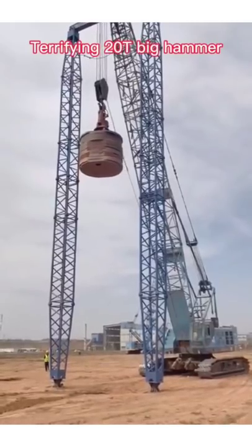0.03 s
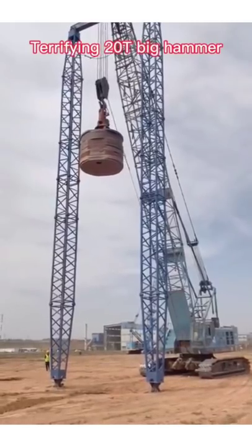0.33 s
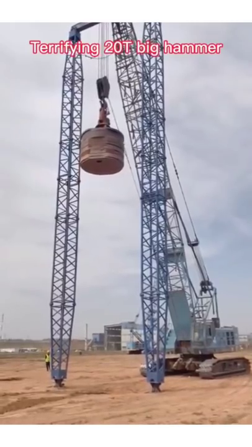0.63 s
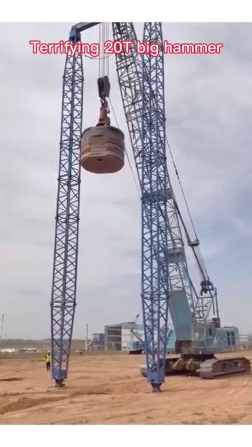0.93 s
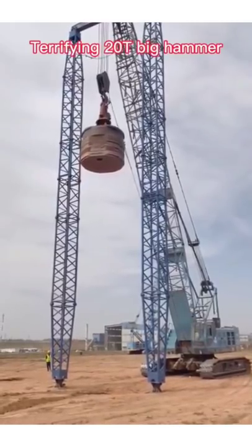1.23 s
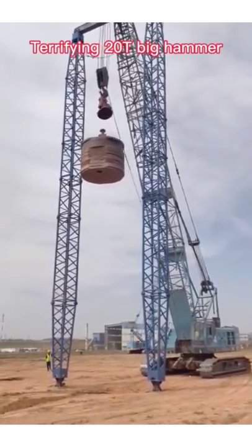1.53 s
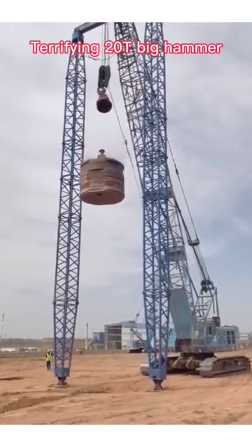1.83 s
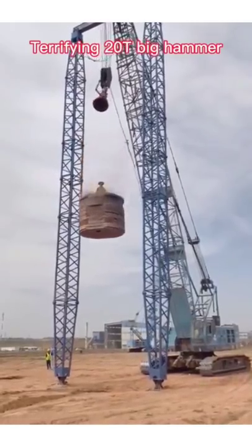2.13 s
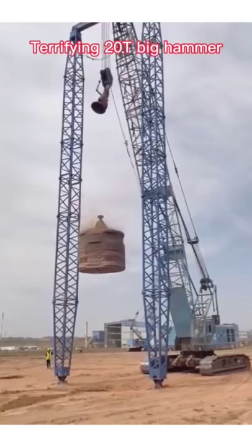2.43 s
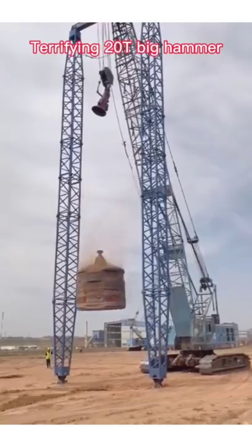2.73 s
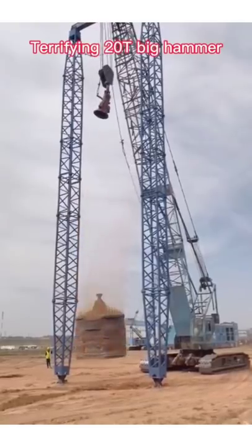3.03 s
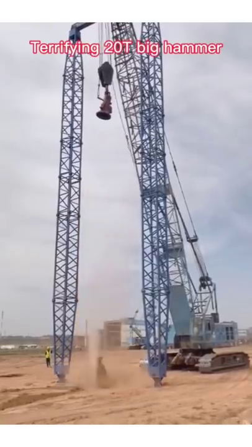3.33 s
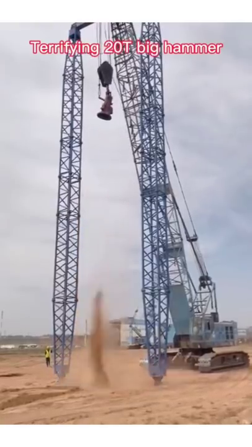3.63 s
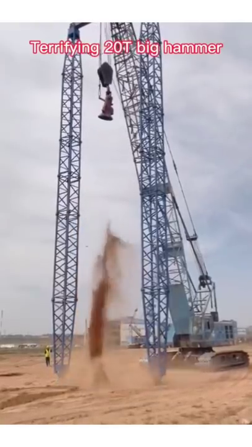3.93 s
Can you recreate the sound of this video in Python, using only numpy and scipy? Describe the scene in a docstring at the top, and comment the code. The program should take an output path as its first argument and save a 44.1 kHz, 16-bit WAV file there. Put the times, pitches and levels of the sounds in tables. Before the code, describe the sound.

A crane drops a heavy weight outdoors, its diesel droning and wind puffing on the microphone throughout. A hissing winch whine sinks until a loud steel clank at about 1.1 seconds. A hollow knock follows at 1.6, while the boom and cables rattle and fade with smaller clanks. At 3.4 seconds the weight thuds into the ground, then soil sprays and patters down with a light metal clink.

```python
"""A crawler crane lifts a heavy tamping weight: the diesel drones, the winch whines, wind hits the mic.
Just after 1 s the hook lets go with a clank, then knocks again. The unloaded boom (the crane's arm)
and its cables rattle while the weight falls. Near 3.4 s it slams into the soil and throws up dirt.
All along, a sliding filter dulls the treble and cuts narrow gaps in it."""
import sys
import numpy as np
from scipy import signal
from scipy.fft import rfft, irfft
from scipy.io import wavfile

SR = 44100
rng = np.random.default_rng(int(sys.argv[2]) if len(sys.argv) > 2 else 0)


def wav_record(signal):
    """Record a signal, one row per channel, as 16-bit PCM in the file named by sys.argv[1]."""
    frames = np.transpose(np.atleast_2d(signal))
    bounded = np.clip(frames, -1, 1)
    # unit amplitude maps onto the largest positive 16-bit level
    quanta = np.round(bounded * 32767).astype(np.int16)
    wavfile.write(sys.argv[1], SR, quanta)


N = 176400


def amp(db):
    """Turns decibels into a gain."""
    return 10 ** (np.asarray(db) / 20)


def evened(x):
    """Scales a signal to an average strength (rms) of 1."""
    return x / np.sqrt(np.mean(x ** 2) + 1e-20)


def curve(rows, column=1):
    """Joins one column of a time table with straight lines."""
    rows = np.array(rows)
    return np.interp(np.arange(N) / SR, rows[:, 0], rows[:, column])


def noise(size=N):
    """Plain white noise."""
    return rng.standard_normal(size)


def colour(x, points, scale=1, tilt_db=0):
    """Sets the mix of bass and treble, moved in pitch by scale and tilted per octave; rms 1."""
    hz = np.fft.rfftfreq(len(x), 1 / SR) + 1
    point_hz, point_db = np.transpose(points)
    shape_db = np.interp(np.log(hz), np.log(point_hz * scale), point_db)
    shape_db += tilt_db * np.log2(np.clip(hz, 150, 4000) / 1000)
    return evened(irfft(rfft(x) * amp(shape_db) * hz / (hz + 8), len(x)))


def wander(hz):
    """A random drift, up to about hz wiggles a second; rms 1."""
    rates = np.fft.rfftfreq(1024, N / SR / 1024)
    slow = evened(irfft(rfft(noise(size=1024)) / (1 + (rates / hz) ** 4)))
    return np.interp(np.arange(N), np.linspace(0, N, len(slow)), slow)


def grains(per_s, spread_db, wash, size=N):
    """Tiny random hits of uneven size over a soft hiss."""
    strength = amp(spread_db * np.minimum(rng.exponential(1, size), 3))
    hits = strength * np.sign(noise(size)) * (rng.random(size) < per_s / SR)
    return evened(hits) + wash * noise(size)


def blow(db, rise, hold, fade):
    """The loudness of one hit: it swells, holds, then drops 60 dB in fade seconds."""
    t = np.arange(SR) / SR
    return np.minimum(t / rise, 1) ** 2 * amp(db - 60 * np.maximum(t - rise - hold, 0) / fade)


def ring(notes, rise):
    """One second of the fading notes of something struck."""
    t = np.arange(SR) / SR
    ringing = sum(amp(db - 60 * t / fade) * np.sin(2 * np.pi * (hz * t + rng.random()))
                  for hz, db, fade in notes)
    return np.sqrt(2) * np.minimum(t / rise, 1) * ringing


def tone(hz, waver):
    """A slightly unsteady pure tone; rms 1."""
    cycles = np.cumsum(hz * (1 + waver * wander(hz=25))) / SR
    return np.sqrt(2) * np.sin(2 * np.pi * (cycles + rng.random()))


def add(mix, start, sound):
    """Mixes a sound in at start seconds."""
    first = round(start * SR)
    sound = sound[max(-first, 0):]
    part = mix[max(first, 0):][:len(sound)]
    part += sound[:len(part)]


def high_tone():
    """A faint, breathy high tone slides down with the filter sweep at first, then holds."""
    # its path: time_s, pitch_hz, level_db
    tone_path = [(0, 3620, -45.5), (1.2, 3000, -49.5)]
    breath = amp(curve(tone_path, column=2)) * wander(hz=45)
    return breath * tone(curve(tone_path), waver=.01)


def wind():
    """Wind pushes on the microphone: a lumpy rumble and short puffs."""
    # tone colour of rumble and puffs: pitch_hz, level_db
    rumble_colour = [(12, -12), (28, -2), (60, 0), (110, -3), (200, -16), (2000, -80)]
    puff_colour = [(20, -16), (70, -9), (140, 0), (230, -2), (420, -9), (700, -24), (2000, -50)]
    # loudness of the rumble: time_s, level_db
    rumble_level = [(0, -32), (.3, -37), (.5, -45), (.62, -35), (.8, -35), (.98, -42), (1.1, -30),
                    (1.19, -53), (2, -41), (2.24, -34), (2.53, -43), (3.27, -36), (4, -33.5)]
    # puffs: middle_s, half_length_s, level_db, pitch_factor
    puffs = [(.015, .025, -23, 1.1), (.185, .012, -20, 1.1), (.25, .016, -25, 1), (.598, .02, -24.5, 1.2),
             (.73, .022, -21, 1.15), (.835, .03, -28, 1), (.895, .02, -25, 1.1), (1.035, .022, -25, .9),
             (2.15, .025, -31, .8), (2.24, .015, -29, .6), (2.315, .02, -27, .65), (3.125, .018, -25, .7),
             (3.275, .02, -28, .7), (3.42, .03, -25, .8), (3.98, .02, -20, .7)]
    out = amp(curve(rumble_level) + 2.5 * wander(hz=14)) * colour(noise(), rumble_colour)
    t = np.arange(-SR // 4, SR // 4) / SR
    for middle, half_length, db, scale in puffs:
        swell = amp(db) * np.exp(-.5 * (t / half_length) ** 2)
        add(out, middle + t[0], swell * colour(noise(len(t)), puff_colour, scale))
    return out


def diesel():
    """The engine drones and the machinery hums; the drone eases as the load lets go."""
    # tone colour of the drone: pitch_hz, level_db
    drone_colour = [(25, -18), (70, -8.5), (135, 2), (340, -4), (470, -12.5), (800, -12), (1150, -26),
                    (2100, -26), (5000, -54), (14000, -62)]
    # its loudness: time_s, level_db
    drone_level = [(1.1, -35), (1.25, -39), (2.15, -32.5), (3.3, -33.5)]
    # humming notes: pitch_hz, level_db
    hum_notes = [(172, -44), (431, -47), (565, -48)]
    drone = amp(curve(drone_level) + 1.5 * wander(hz=12)) * colour(noise(), drone_colour)
    hum = sum(amp(db + 3 * wander(hz=6)) * tone(hz, waver=.02) for hz, db in hum_notes)
    return drone + hum


def winch():
    """The winch hisses under load while its whine sinks in pitch."""
    # main whine and brief upper whine: time_s, pitch_hz, level_db
    main_whine = [(0, 1000, -48), (.25, 885, -45), (.48, 858, -44), (.62, 846, -39), (.92, 806, -35),
                  (1.03, 775, -38), (1.12, 742, -36), (1.17, 725, -65)]
    upper_whine = [(0, 1100, -44), (.2, 1040, -47), (.6, 960, -70)]
    # tone colour of the hiss: pitch_hz, level_db
    hiss_colour = [(150, -8), (500, 0), (1300, -6.5), (2600, -5.5), (3400, -7.5), (4800, -6), (7000, -13.5),
                   (14000, -30)]
    # its loudness: time_s, level_db
    hiss_level = [(0, -35), (.45, -36), (.8, -34.5), (1.1, -36), (1.9, -41), (2.4, -60), (4, -62)]
    whine = sum(amp(curve(path, column=2) + 1.5 * wander(hz=20)) * tone(curve(path), waver=.004)
                for path in (main_whine, upper_whine))
    hiss = amp(curve(hiss_level)) * colour(noise(), hiss_colour)
    return whine + hiss


def rattle():
    """Many small hits ring the steel boom and its cables."""
    # tone colour of the rattle: pitch_hz, level_db
    rattle_colour = [(80, -22), (180, -4), (330, 0), (500, -3.5), (1100, -2), (1700, -8.5), (2700, -7.5),
                     (4000, -15), (7500, -20), (14000, -36)]
    # its loudness: time_s, level_db
    rattle_level = [(1.14, -80), (1.19, -25), (1.37, -26.5), (1.43, -23.5), (1.55, -23.5), (1.68, -27.5),
                    (1.8, -30.5), (1.95, -29.5), (2.15, -35), (2.35, -41), (2.53, -45), (2.75, -38),
                    (3, -38.5), (3.3, -55), (4, -70)]
    one_hit = noise(SR) * blow(db=0, rise=.001, hold=0, fade=.1)
    shaken = signal.fftconvolve(grains(per_s=350, spread_db=3.5, wash=.6), one_hit)[:N]
    return amp(curve(rattle_level) + .8 * wander(hz=15)) * colour(shaken, rattle_colour)


def clanks():
    """Steel hits steel: each crash rings the hook, and its treble dies twice as fast as the rest."""
    # clanks of hook and boom: start_s, level_db, rise_s, fade_s, tilt_db_per_octave
    hits = [(1.141, -6.7, .012, .08, 3.4), (1.158, -10.5, .014, .27, -1.8), (1.235, -15.3, .014, .42, -1.7),
            (1.838, -21, .008, .22, -3), (2.272, -27, .016, .13, 8.5), (2.588, -26.5, .005, .4, -7.5),
            (2.676, -30.5, .006, .25, -4.5), (2.875, -27, .006, .2, -5.5)]
    # tone colour of a crash before its tilt: pitch_hz, level_db
    crash_colour = [(60, -30), (150, -12), (230, -1), (600, 0), (1000, -2), (1650, -2), (2100, -9),
                    (3300, -3), (4500, -4), (6500, -7), (11000, -14), (15000, -30)]
    # the hook's own notes: pitch_hz, relative_level_db, fade_s
    hook_notes = [(250, -13, .36), (510, -9, .3), (603, -11, .3), (968, -15, .3), (1567, -14, .2),
                  (1728, -20, .3), (1855, -19, .35), (2487, -24, .35), (3322, -18, .25)]
    # the boom's low ring as the load leaves it: start_s, level_db, rise_s, fade_s, pitch_hz
    boom_note = (1.231, -14, .014, .3, 352)
    treble_hz, hook_db = 7000, -5.5
    out = np.zeros(N)
    cut_treble = signal.butter(2, treble_hz, fs=SR, output="sos")
    for start, db, rise, fade, tilt in hits:
        crash = colour(grains(per_s=4000, spread_db=2.5, wash=1.2, size=SR), crash_colour, tilt_db=tilt)
        body = signal.sosfiltfilt(cut_treble, crash)
        treble = crash - body
        add(out, start, body * blow(db, rise, 0, fade) + treble * blow(db, rise, 0, fade / 2))
        notes = [(hz, level + tilt * np.log2(hz / 1000), decay) for hz, level, decay in hook_notes]
        add(out, start, amp(db + hook_db) * ring(notes, rise))
    start, db, rise, fade, hz = boom_note
    add(out, start, ring([(hz, db, fade)], rise))
    return out


def knock():
    """The freed hook block gives a hollow knock and rings briefly."""
    # the knock: start_s, level_db, rise_s, hold_s, fade_s
    hit = (1.561, -13.5, .014, .022, .12)
    # its tone colour: pitch_hz, level_db
    knock_colour = [(80, -25), (190, 1), (420, -4), (800, -1), (1000, -6), (1300, 2), (1580, 1),
                    (1780, -15), (2850, -11), (3600, -18), (9000, -36)]
    # the block's own notes: pitch_hz, relative_level_db, fade_s
    block_notes = [(206, -3, .23), (312, -6, .23), (587, -5, .1), (806, -3, .13), (1167, 0, .15),
                   (1324, 0, .16), (2852, -19, .25)]
    start, db, rise, hold, fade = hit
    out = np.zeros(N)
    add(out, start, blow(db, rise, hold, fade) * colour(noise(SR), knock_colour))
    add(out, start + rise / 2, amp(db=-18.5) * ring(block_notes, rise))
    return out


def landing():
    """The weight slams down: the ground shakes, soil sprays up and rains back, loose steel clinks."""
    # the slam: start_s, level_db, rise_s, hold_s, fade_s
    slam = (3.43, -10, .034, .01, .1)
    # tone colour of slam and soil: pitch_hz, level_db
    slam_colour = [(30, 0), (130, 5), (300, 2), (600, -2), (1200, -5.5), (2100, -2), (4000, -2), (7000, -8),
                   (12000, -12), (15000, -19)]
    soil_colour = [(40, -22), (130, 0), (200, 3), (450, -2), (800, -4), (1200, -6.5), (1600, -16),
                   (2600, -18), (5000, -37), (14000, -56)]
    # deep thuds in the ground: start_s, level_db, pitch_hz, fade_s
    thuds = [(3.44, -15, 48, .24), (3.543, -20.5, 32, .4)]
    # sprays of soil: start_s, level_db, rise_s, fade_s, tilt_db_per_octave
    sprays = [(3.485, -28, .015, .34, 10), (3.54, -31, .028, .18, 10), (3.642, -20.5, .022, .2, 2.6)]
    # loudness of falling soil, with a faint patter from the very start: time_s, level_db
    soil_level = [(3.58, -41), (3.69, -28.5), (3.76, -24.3), (3.86, -30), (4, -30.5)]
    # notes of a loose steel part: pitch_hz, level_db, fade_s
    clink_notes = [(2590, -25, .13), (2740, -29, .12), (4500, -44, .15), (4880, -40, .12), (5650, -40, .12)]
    out = amp(curve(soil_level)) * colour(grains(per_s=1100, spread_db=3, wash=.8), soil_colour)
    grit = colour(grains(per_s=4000, spread_db=3, wash=.9, size=SR), slam_colour)
    add(out, slam[0], blow(*slam[1:]) * grit)
    for start, db, hz, fade in thuds:
        add(out, start, ring([(hz, db, fade)], rise=.012))
    for start, db, rise, fade, tilt in sprays:
        add(out, start, blow(db, rise, 0, fade) * colour(noise(SR), soil_colour, tilt_db=tilt))
    clink = ring(clink_notes, rise=.014)
    chatter = amp(3 * wander(hz=70)[:SR])
    add(out, start=3.648, sound=clink * chatter)
    return out


def scene():
    """All the sounds, added into one channel."""
    return (diesel() + winch() + high_tone() + wind() + clanks() + knock() + rattle() + landing())[None]


def record(dry):
    """A treble-dulling filter with a row of notches (narrow gaps) slides down, then partly back up."""
    # path of the lowest notch: time_s, pitch_hz
    notch_path = [(0, 6450), (.25, 6000), (.85, 5780), (1.05, 5480), (1.25, 5100), (1.45, 4620),
                  (1.65, 4330), (1.85, 3900), (2.05, 3400), (2.25, 3060), (2.45, 2860), (2.75, 2620),
                  (3.05, 2720), (3.45, 2980), (3.7, 3220), (4, 3760)]
    # dips and bumps that slide with it: ratio_to_notch_pitch, level_db
    bumps = [(.33, 0), (.41, -5), (.47, -.5), (.56, -1), (.63, 3.5), (.76, 1), (.88, 2), (1.5, .5), (2, -2),
             (2.6, -2.5)]
    crowding, notch_width, notch_db, top_hz = .22, .07, -42, 15000
    hz, t, spectrum = signal.stft(dry, SR, nperseg=512, noverlap=384)
    ratio = hz[:, None] / np.interp(t, *np.transpose(notch_path))
    position = np.sqrt(ratio ** 2 * (1 + crowding) - crowding + 0j)  # notches lie at 1, 2, 3...
    dulling = abs(np.sinc(position))
    from_notch = position.real - np.maximum(np.round(position.real), 1)
    cut_db = notch_db * np.exp(-(from_notch / notch_width) ** 2)
    bump_db = np.interp(ratio, *np.transpose(bumps))
    spectrum = spectrum * dulling / dulling[0] * amp(cut_db + bump_db)
    swept = signal.istft(spectrum, SR, nperseg=512, noverlap=384)[1][:, :N]
    cut_top = signal.firwin(511, top_hz, window=("kaiser", 9), fs=SR)
    return signal.oaconvolve(swept, cut_top[None], "same")


dry = scene()
out = record(dry)
wav_record(out)
```